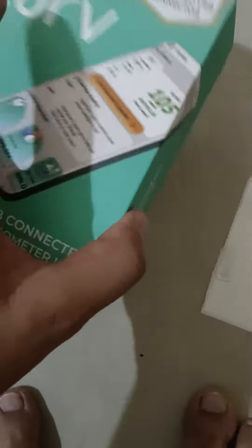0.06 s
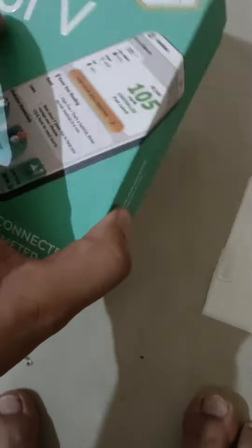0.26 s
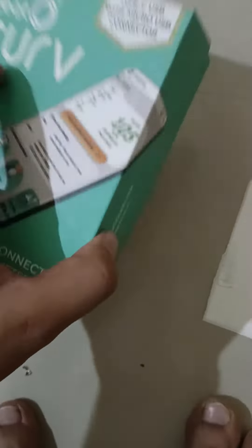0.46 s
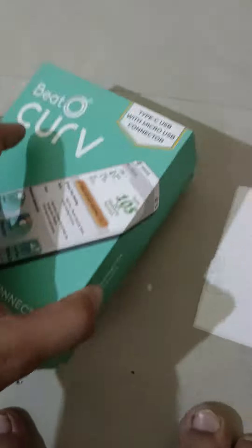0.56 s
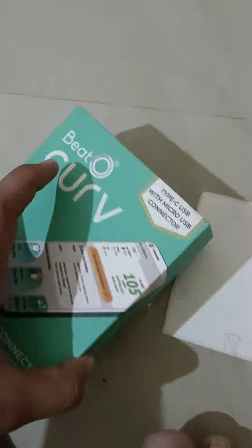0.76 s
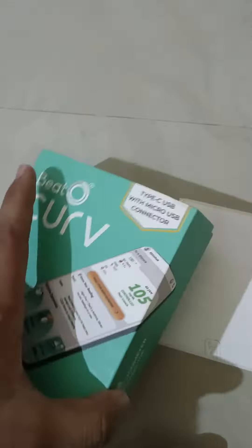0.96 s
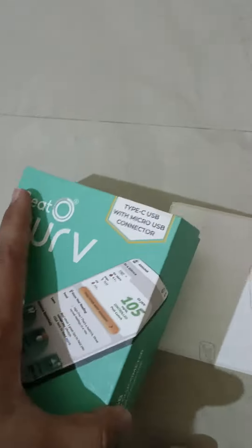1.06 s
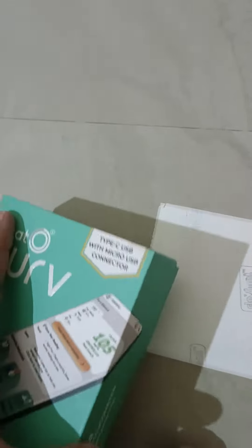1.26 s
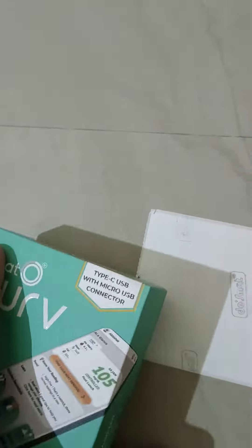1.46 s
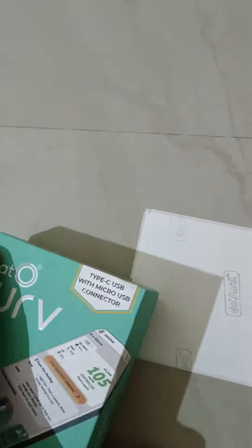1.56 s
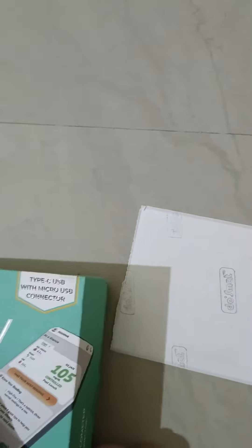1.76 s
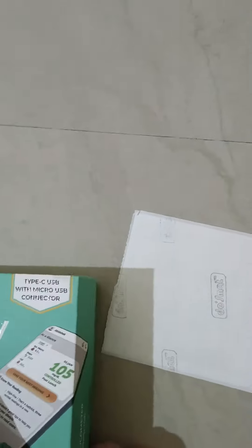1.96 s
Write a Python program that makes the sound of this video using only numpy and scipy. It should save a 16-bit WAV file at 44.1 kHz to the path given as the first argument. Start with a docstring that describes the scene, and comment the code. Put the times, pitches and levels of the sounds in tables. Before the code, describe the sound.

A small cardboard box is handled close to the microphone in a bare room. Fingers and shifting contents make quick, sharp, hollow knocks, which thin out into soft strokes of skin on card over a low room rumble.

```python
"""A bare room with a stone floor: close to a phone, a hand shifts its grip on a small cardboard box. Fingers
and shifting contents knock on its walls: each contact snaps the stiff card and thumps the hollow box, with
blunt tocks and soft palm bumps underneath. Among the knocks and after them, skin and card slide over each other
in a few soft strokes, above a bed of low room rumble."""
import sys
import numpy as np
from scipy import signal
from scipy.fft import rfft, irfft
from scipy.io import wavfile
from scipy.ndimage import uniform_filter1d

SR = 44100
rng = np.random.default_rng(int(sys.argv[2]) if len(sys.argv) > 2 else 0)


def waveform_to_disk(signal):
    """Save audio, clipped to [-1, 1], as 16-bit WAV at the path in sys.argv[1]."""
    frames = np.transpose(np.atleast_2d(signal))
    scaled = np.clip(frames, -1, 1) * 32767
    samples = np.round(scaled).astype(np.int16)
    wavfile.write(sys.argv[1], SR, samples)


N = 88200

# Tone of the room's rumble (frequency [Hz], relative level [dB])
RUMBLE_SPECTRUM = [(20, -44), (45, -15.5), (70, 3), (110, 4), (220, -3), (400, -4.5), (800, -12),
                   (1600, -15.5), (2600, -24.5), (4200, -32), (7000, -36.5), (8500, -44), (15500, -58.5)]
# Early reflections off floor and walls (delay [s], left gain [linear], right gain [linear])
REFLECTIONS = [(0.0078, 0.12, 0.18), (0.0118, 0.14, 0.11), (0.0215, 0.09, 0.042), (0.036, 0.079, 0.13)]
# Bands of the reverb tail (frequency [Hz], level [dB], t60 [s])
REVERB_BANDS = [(120, -13, 0.62), (302, -9.5, 0.44), (370, -4, 0.25), (560, -7, 0.37), (766, -15, 0.62),
                (990, -8, 0.2), (1560, -15.5, 0.4), (3240, -7.5, 0.29), (6900, -16, 0.62),
                (14100, -3.5, 0.49)]

# Sliding strokes (time [s], length [s], hiss [dB], top sizzle [dB], rubbed body [dB])
STROKES = [(0.229, 0.055, -52, -59, -38), (0.424, 0.055, -51, -65, -37), (0.598, 0.032, -50, -52, -48),
           (0.641, 0.034, -60, -53, -60), (0.700, 0.19, -71.5, -77, -60), (0.81, 0.045, -53, -69, -50),
           (0.825, 0.17, -53, -60, -48.5), (0.884, 0.032, -54, -54, -67), (0.898, 0.24, -57.5, -64, -56),
           (1.213, 0.066, -63, -67.5, -66), (1.272, 0.29, -67.5, -81, -74), (1.498, 0.087, -64, -60.5, -66),
           (1.688, 0.086, -67, -56, -78), (1.728, 0.36, -66, -72, -57), (1.852, 0.06, -54, -55, -57.5),
           (1.985, 0.0075, -70, -55.5, -52)]
# Dry scuffs of the card's edge (time [s], length [s], level [dB])
EDGE_SCUFFS = [(0.815, 0.017, -53.5), (0.866, 0.042, -57), (0.944, 0.024, -68)]
# Tone of each friction layer and of the edge tick (frequency [Hz], relative level [dB])
HISS_SPECTRUM = [(800, -11), (2500, 5), (4300, 5), (5100, 5.5), (5800, 5.5), (6700, 3.5), (8000, -3),
                 (10500, -5.5), (12000, -9), (15500, 3)]
SIZZLE_SPECTRUM = [(2000, -28), (5900, -10.5), (6700, 4), (7600, -14.5), (10800, -7), (11900, 3),
                   (13400, -1.5), (15000, -13.5), (15900, 0)]
RUB_SPECTRUM = [(80, 5.5), (250, -1.5), (400, -8.5), (800, 3.5), (1100, -8.5), (1700, -7.5), (3000, -9),
                (7000, -56.5)]
SCUFF_SPECTRUM = [(500, -12), (1500, -5), (3000, 3), (4000, -4), (8000, -20), (15000, -28)]
TICK_SPECTRUM = [(1000, -48), (3000, 15.5), (4500, 2.5), (6500, 11.5), (8500, -1.5), (10500, -11),
                 (12200, 3.5), (14500, -6), (15800, -17)]

# Soft palm bumps and blunt tocks on a side panel (time [s], level [dB])
PALM_HITS = [(0.229, -48), (0.274, -39), (0.443, -42.5), (0.632, -32), (0.725, -39), (1.011, -47.5),
             (1.090, -50.5), (1.555, -57), (1.867, -53.5), (1.951, -49.5)]
TOCK_HITS = [(0.2839, -30.5), (0.4385, -31.5), (0.6020, -29), (0.6315, -19.5), (0.6620, -40)]
# Knocks, ahead of the box's radiation EQ
# (time [s], thump [dB], clop [dB], crack [dB], crack focus [Hz], tick [dB], left minus right [dB])
KNOCK_HITS = [(0.2207, -26.5, -32, -18, 1820, -41.5, 0.5), (0.2270, -14.5, -24.5, -22, 2400, -44, 2.5),
              (0.258, -31, -33, -40, 2160, -47, -2), (0.2833, -37, -42, -34.5, 1269, -62, 6),
              (0.307, -34.5, -31, -42, 3600, -48.5, -0.5), (0.357, -61, -59, -61, 1600, -78, -2),
              (0.3775, -24.5, -34.5, -25.5, 2480, -40.5, 4.5), (0.3941, -32.5, -63, -45.5, 1584, -64, 18.5),
              (0.4100, -33, -36, -33.5, 1600, -77, -2), (0.4191, -28.5, -30, -22.5, 1580, -40, 1),
              (0.4375, -30, -27, -31.5, 1300, -51, 0.5), (0.4465, -25.5, -37, -47, 1800, -54, 7.5),
              (0.5123, -39.5, -64, -55.5, 1600, -90, -5), (0.5555, -31.5, -55, -18.5, 1375, -46, -1),
              (0.5577, -15, -20.5, -19, 1615, -47, 3.5), (0.6007, -28, -27, -34, 1690, -46, 0.5),
              (0.6319, -33, -31, -32.5, 1230, -45, 1.5), (0.6470, -33.5, -53, -62, 1400, -75, 6),
              (0.6620, -43, -58, -45.5, 1400, -73, -6), (0.747, -58, -68, -72, 2900, -65.5, 0),
              (0.754, -48, -68, -56.5, 2750, -76, -8.5), (0.8512, -35.5, -44, -33.5, 1430, -57, 0),
              (0.877, -39.5, -47, -67, 1500, -57, -0.5), (0.9760, -75, -56, -60, 3130, -58, -3),
              (1.0980, -56, -56, -58.5, 1260, -69.5, -5.5), (1.2195, -64, -53.5, -67, 1300, -82, -6),
              (1.7680, -61, -54.5, -65.5, 2470, -68, -10.5), (1.875, -52, -52.5, -51.5, 1450, -64.5, -6)]
# Resonances of the box (frequency [Hz], relative level [dB], t60 [s])
HELD_BOX_MODES = [(112.4, -12, 0.33), (144.5, 6, 0.096), (170, -1, 0.053)]  # the box as a whole: bump
SIDE_PANEL_MODES = [(407, -0.5, 0.05), (659, -7, 0.022), (740, 8, 0.013), (900, -15, 0.0042)]  # a side panel: tock
HOLLOW_MODES = [(273.4, -3, 0.037), (347.4, -2, 0.035), (401.4, 7.5, 0.028), (377.8, -22.5, 0.31),
                (473.3, -31, 0.54), (307.4, -26.5, 0.4)]  # the hollow inside: thump
PANEL_MODES = [(590, -12, 0.012), (747, -2.5, 0.04), (826, 9, 0.014), (961, 5, 0.026)]  # bending panels: clop
STIFF_CARD_MODES = [(1313, 10.5, 0.017), (1480, 10, 0.0061), (1666, 19, 0.004), (1727, -9, 0.018),
                    (1890, -3, 0.0138), (2117, 1.5, 0.014), (2244, -6, 0.012), (2800, -12, 0.0061),
                    (3450, -10.5, 0.013), (4500, -39.5, 0.0023), (5100, -57, 0.0085), (6870, -14, 0.021),
                    (1244, -11.5, 0.25), (1800, -37.5, 0.2)]  # stiff card: crack
# How the box radiates: dips between mode groups, a lift around 290 Hz in the thump (frequency [Hz], gain [dB])
RADIATION_EQ = [(200, -3.5), (290, 4), (450, -2.5), (570, -7.5), (720, -4), (930, -4), (1060, -6),
                (1200, -2), (3100, -0.5), (4000, 0), (6500, -3), (9500, -9.5), (12000, -7)]

RUMBLE_DB, RUMBLE_WIDTH, REVERB_BUILD_S = -55.5, 0.54, 0.0062
GRAIN_DB, GRAIN_S, SNAGS_PER_S, SNAG_DB = 1.5, 0.002, 130, 17.5
CHATTER_S, CHATTER_DB, FOCUS_DB = 0.0023, 3, 6.5
TICK_RISE_S, TICK_DECAY_S, THUMP_DELAY_S = 0.00076, 0.0028, 0.00043
HIT_WINDOW_S, TOP_HZ = 0.012, 15750
RING_T = np.arange(int(SR * .5)) / SR  # time since a hit [s]


def undb(db):
    """Decibels to gain."""
    return 10 ** (np.asarray(db) / 20)


def unit(x):
    """Scale to rms 1."""
    return x / np.sqrt(np.mean(x ** 2))


def hit(x, db):
    """Scale a transient so that its energy, packed into the hit window, has this level."""
    return x * undb(db) * np.sqrt(SR * HIT_WINDOW_S / np.mean(np.sum(x ** 2, axis=-1)))


def pan(db):
    """Stereo gains for a left-minus-right balance: negative leans right."""
    return undb(np.array([[db], [-db]]) / 2)


def add(out, x, start):
    """Mix a sound in at its cue, in seconds."""
    i = max(int(start * SR), 0)
    part = out[:, i:i + x.shape[-1]]
    part += x[..., :part.shape[-1]]


def eq(x, points):
    """Minimum-phase EQ through (frequency [Hz], gain [dB]) points: no pre-ring on attacks."""
    size = 2 * x.shape[-1]
    hz, db = np.array(points, float).T
    log_hz = np.log(np.fft.rfftfreq(size, 1 / SR) + 1)
    cepstrum = irfft(np.log(undb(np.interp(log_hz, np.log(hz), db))))
    cepstrum[1:size // 2] *= 2
    cepstrum[size // 2 + 1:] = 0
    return irfft(rfft(x, size) * np.exp(rfft(cepstrum)))[..., :size // 2]


def stereo_noise(size, width):
    """White noise: mono at width 0, fully wide at 1."""
    mid, side = rng.standard_normal((2, size))
    return unit(np.array([mid + width * side, mid - width * side]))


def ring(modes, rise_s, cut_hz, order, lag_s=0.00019):
    """Damped modes, later on the right; low-cut, as small panels radiate little below resonance."""
    t = np.maximum(RING_T - np.array([[0], [lag_s]]), 0)
    attack = 1 - np.exp(-(t / rise_s) ** 2)
    tones = sum(undb(db - 60 * t / t60) * np.sin(2 * np.pi * hz * t) for hz, db, t60 in modes)
    return signal.sosfilt(signal.butter(order, cut_hz, "high", fs=SR, output="sos"), attack * tones)


def room_rumble():
    """A steady bed of low air, nearly mono in the bass and wider above."""
    mid, side = eq(rng.standard_normal((2, N)), RUMBLE_SPECTRUM)
    side = RUMBLE_WIDTH * eq(side, [(120, -12), (600, 7)])
    return undb(RUMBLE_DB) * unit(np.array([mid + side, mid - side]))


def room_reverb(x):
    """Floor and near walls slap back first; a diffuse tail follows, each band at its own decay."""
    hz, db, t60 = np.array(REVERB_BANDS, float).T
    t = np.arange(SR) / SR
    log_hz = np.log(np.fft.rfftfreq(SR, 1 / SR) + 1)
    noise = rfft(stereo_noise(SR, width=0.61))
    response = np.zeros((2, SR))
    for weights, band_db, decay in zip(np.eye(len(hz)), db, t60):
        band = irfft(noise * np.interp(log_hz, np.log(hz), weights))
        fade = undb(-60 * t / decay) * (1 - np.exp(-(t / REVERB_BUILD_S) ** 2))
        response += band * undb(band_db) * fade / np.sqrt(np.sum(fade ** 2))
    for delay, left, right in REFLECTIONS:
        add(response, np.array([[left], [right]]), delay)
    return x + signal.fftconvolve(x, response, axes=1)[:, :N]


def skin_slides():
    """Tiny slips of skin on card, with a few sharper snags, hiss and stir the box; its edge scuffs."""
    out, t = np.zeros((2, N)), np.arange(N) / SR
    grip = unit(uniform_filter1d(rng.standard_normal(N), int(GRAIN_S * SR)))
    snags = (rng.random(N) < SNAGS_PER_S / SR) * rng.standard_normal(N) * undb(SNAG_DB)

    def friction(spectrum):
        """One grainy layer; all layers share the same grip and snags."""
        slips = stereo_noise(N, width=1) + snags
        return unit(eq(slips * undb(GRAIN_DB * grip), spectrum))

    def swell(start, length):
        """A bell-shaped fade in and out, peaking mid-stroke."""
        return np.exp(-(3 * ((t - start) / length - .5)) ** 2) / np.sqrt(2)

    hiss = friction(HISS_SPECTRUM) * pan(db=-7)
    sizzle = friction(SIZZLE_SPECTRUM) * pan(db=-16.5)
    rub = friction(RUB_SPECTRUM) * pan(db=-6.5)
    scuff = friction(SCUFF_SPECTRUM) * pan(db=-11)
    for start, length, hiss_db, sizzle_db, rub_db in STROKES:
        blend = undb(hiss_db) * hiss + undb(sizzle_db) * sizzle + undb(rub_db) * rub
        out += swell(start, length) * blend
    for start, length, db in EDGE_SCUFFS:
        out += swell(start, length) * undb(db) * scuff
    return out


def palm_bumps():
    """Low-end weight: the soft palm moves only the lowest modes."""
    out = np.zeros((2, N))
    body = ring(HELD_BOX_MODES, rise_s=0.0019, cut_hz=52, order=2)
    for start, db in PALM_HITS:
        add(out, hit(body, db), start)
    return out


def panel_tocks():
    """Blunt contacts ring only the mids of a side panel, right of centre."""
    out = np.zeros((2, N))
    panel = ring(SIDE_PANEL_MODES, rise_s=0.00073, cut_hz=263, order=2, lag_s=0.00033)
    for start, db in TOCK_HITS:
        add(out, hit(panel, db) * pan(db=-3), start)
    return out


def edge_tick():
    """The card's edge tops off a knock with a tiny burst of bright noise."""
    envelope = np.exp(-RING_T / TICK_DECAY_S) * (1 - np.exp(-RING_T / TICK_RISE_S))
    return eq(stereo_noise(len(RING_T), width=0.76) * envelope, TICK_SPECTRUM)


def card_crack(card_ring, focus_hz):
    """A contact strikes the stiff card and chatters briefly; an EQ peak pitches the snap."""
    contact = stereo_noise(len(RING_T), width=0.58) * np.exp(-RING_T / CHATTER_S)
    contact *= undb(CHATTER_DB) / np.sqrt(np.sum(contact ** 2) / 2)
    contact[:, 0] += 1  # the strike itself
    snap = signal.fftconvolve(contact, card_ring, axes=1)[:, :len(RING_T)]
    return eq(snap, [(focus_hz / 2, 0), (focus_hz, FOCUS_DB), (focus_hz * np.sqrt(2), 0)])


def box_knocks():
    """Each contact cracks the card, ticks its edge, bends a panel and thumps the hollow box."""
    out = np.zeros((2, N))
    thump = ring(HOLLOW_MODES, rise_s=0.0019, cut_hz=176, order=3)
    clop = ring(PANEL_MODES, rise_s=0.00057, cut_hz=150, order=2, lag_s=0.00046)
    card_ring = ring(STIFF_CARD_MODES, rise_s=0.00005, cut_hz=1094, order=5)
    for start, thump_db, clop_db, crack_db, focus_hz, tick_db, pan_db in KNOCK_HITS:
        crack = hit(card_crack(card_ring, focus_hz), crack_db) * pan(db=-1.5)
        tick = hit(edge_tick(), tick_db) * pan(db=-2)
        add(out, (hit(clop, clop_db) + crack + tick) * pan(pan_db), start)
        add(out, hit(thump, thump_db) * pan(pan_db), start + THUMP_DELAY_S)
    return eq(out, RADIATION_EQ)


def scene():
    """The mix: impacts go through the room reverb, slides stay dry over the rumble."""
    impacts = box_knocks() + panel_tocks() + palm_bumps()
    return room_reverb(impacts) + skin_slides() + room_rumble()


def record(dry):
    """The phone cuts the top end with a steep low-pass."""
    return signal.sosfilt(signal.ellip(14, .2, 80, TOP_HZ, fs=SR, output="sos"), dry)


dry = scene()
out = record(dry)
waveform_to_disk(out)
```